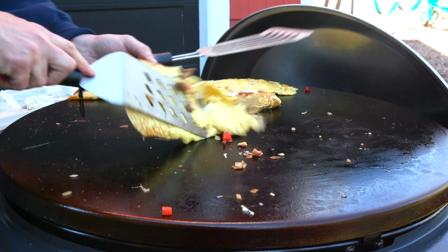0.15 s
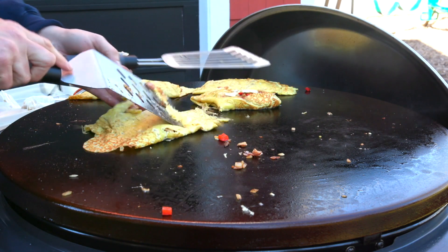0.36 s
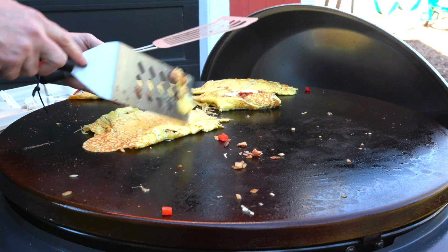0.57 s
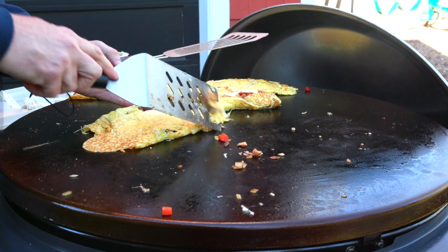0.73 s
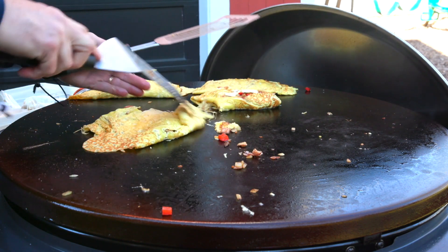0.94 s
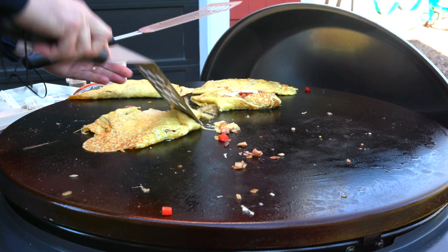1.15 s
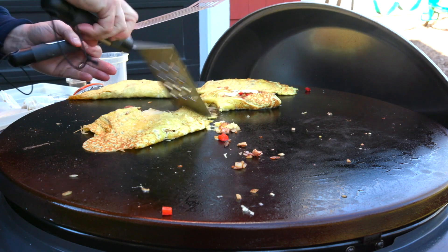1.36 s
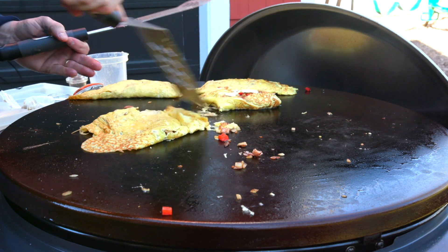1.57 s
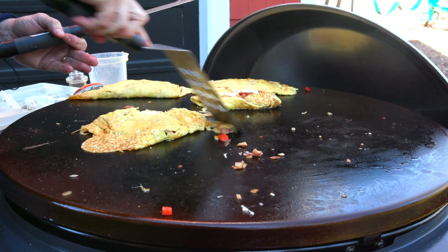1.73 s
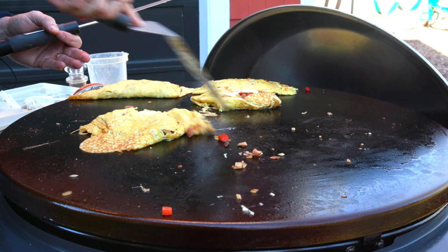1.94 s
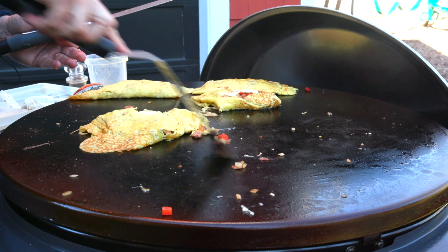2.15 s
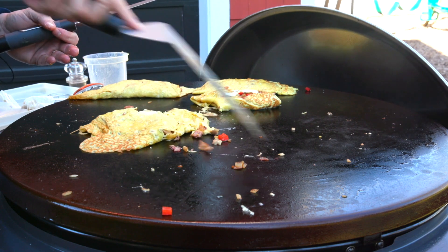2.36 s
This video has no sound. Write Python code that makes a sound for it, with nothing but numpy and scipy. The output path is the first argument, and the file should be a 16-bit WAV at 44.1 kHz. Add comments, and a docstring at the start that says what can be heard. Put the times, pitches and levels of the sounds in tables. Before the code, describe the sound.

A steel spatula clanks and scrapes on an outdoor griddle close to the microphone. A muffled slide under food comes first, then five ringing taps with brief, slightly squeaky drags, over a quiet sizzle of fat.

```python
"""Spatula on a steel griddle

Outdoors, a steel spatula slides softly under an omelette, then lands five times on the bare plate
and drags. Impact and stick-slip friction excite the modes of plate and blade, which ring on.
Fat sizzles and spits quietly throughout, over a low outdoor background."""
import sys
import numpy as np
from scipy import signal
from scipy.fft import rfft, irfft
from scipy.io import wavfile
from scipy.ndimage import uniform_filter1d

SR = 44100
rng = np.random.default_rng(int(sys.argv[2]) if len(sys.argv) > 2 else 0)


def log_audio(samples):
    """Write samples as a 16-bit WAV file to the path given in sys.argv[1]."""
    # one column per channel
    frames = np.atleast_2d(samples).T
    # limit to full scale, then quantise
    limited = np.clip(frames, -1, 1)
    pcm = np.round(limited * 32767).astype(np.int16)
    wavfile.write(sys.argv[1], SR, pcm)


N = 110250
T = np.arange(N) / SR
FFT_SIZE = 4096
AGE = np.arange(8 * FFT_SIZE) / SR   # time since a contact began [s]


# Blade landings: (time [s], level [dB], knock [dB], bass [dB], treble [dB], top [dB])
IMPACTS = [(0.77, 6.5, -1.5, 3, -9.5, -15.5), (1.134, -4, 2, 7.5, 3, 1), (1.44, -3.5, 5.5, 6.5, -1, 0.5),
           (1.7561, -1.5, 11.5, 6, 7.5, 0.5), (2.135, 0.5, 2.5, 7, -4, 6)]
# Edge drags: (start [s], hardest press [s], lift [s], swell width [s], release [s], level [dB],
# light contact [dB], edge resonance [dB], bass [dB], treble [dB], top [dB], squeal [Hz], squeal [dB])
STROKES = [(0.785, 0.861, 0.9, 0.019, 0.006, -30, -1, -8, -5.5, -0.5, -6.5, 5680, -3),
           (1.132, 1.193, 1.201, 0.004, 0.0025, -36.5, -5, -15, 0.5, 7, 9.5, 7090, 3),
           (1.443, 1.452, 1.496, .012, 0.0079, -34, -4, -2, 3, -17.5, -3, 5870, -16),
           (1.765, 1.846, 1.881, 0.023, 0.024, -26.5, -9.5, 6, -7.5, 2.5, 2, 5870, -8.5),
           (2.136, 2.227, 2.287, 0.04, 0.03, -26, -9.5, -5, -5, -1.5, 4, 2885, -11.5)]
def spatula():
    """Forced vibration: the slide, the landings and the drags all set the same steel ringing."""
    direct, ring, total_force = np.zeros((3, N))
    contacts = [(0.00036, slide())] + [(s, landing(*row)) for s, *row in IMPACTS]
    for start, *row in STROKES:
        force, squeal = drag(start, *row)
        contacts.append((start, force))
        add(direct, start, squeal)
    for s, db, *_, top_db in IMPACTS:
        add(direct, s, tick(db + top_db))
    for s, force in contacts:
        add(total_force, s, force)
        add(ring, s, dense_ring(force))
    return direct + ring + clear_modes(total_force)


def landing(db, *tone_db, rattle_s=0.01):
    """Impact force: an impulse, then a brief rattle of the edge."""
    rattle = from_db(-24.5) * noise_burst(rattle_s)
    return from_db(db) * angled((AGE == 0) + rattle, *tone_db)


def tick(db):
    """Contact transient: the first instant of steel on steel radiates a bright snap."""
    highpass = signal.butter(2, 4927, "high", fs=SR, output="sos")
    return from_db(db - 36) * signal.sosfilt(highpass, noise_burst(decay_s=0.0011) + 1e-18)


# Resonances of the blade pressed on the plate: (frequency [Hz], bandwidth [Hz], gain [dB])
CONTACT_RESONANCES = [(679, 63, -30.5), (1554, 63, -28), (2210, 53, -27), (3610, 170, -21),
                      (6400, 350, -26)]
def drag(start, press, lift, width, release, db, light_db, edge_db,
         bass_db, treble_db, top_db, squeal_hz, squeal_db):
    """Sliding friction: force and squeal swell with the pressure and die away after the lift."""
    t = start + AGE
    pressing = swell(t, press, width)
    pressure = np.maximum(pressing, from_db(light_db))
    since_lift = np.maximum(t - lift, 0)
    slips = friction() * pressure * np.exp(-since_lift / release)
    edge = sum(from_db(edge_db + gain_db) * resonate(slips, hz, width_hz)
               for hz, width_hz, gain_db in CONTACT_RESONANCES)
    force = angled(slips + edge, bass_db - 4.5, bass_db, treble_db, top_db)
    tone = wavering(squeal_hz, wobble_hz=45.6, rough_db=3.5, size=len(AGE))
    squeal = tone * pressing * np.exp(-since_lift / 0.028)
    return from_db(db) * force, from_db(db + squeal_db) * squeal


def friction(judder_db=2.5):
    """Stick-slip motion: tiny slips of the edge, bunched by the judder of the blade."""
    slips = grains(per_s=2200, spread_db=4, size=len(AGE))
    return slips * from_db(judder_db * flutter(len(AGE)))


# Knock, bass, middle, treble and top of the contact force: (frequency [Hz])
BANDS_HZ = [220, 550, 2000, 5500, 11000]
def angled(force, knock_db, bass_db, treble_db, top_db):
    """Spectral weighting: the angle of the blade colours the contact force."""
    return colour(force, list(zip(BANDS_HZ, [knock_db, bass_db, 0, treble_db, top_db])))


# Modes of the plate and of the blade: (frequency [Hz], gain [dB], T60 [s])
PLATE_MODES = [(193, -26, 1.0), (408, -29, .5), (487, -25, .8), (516, -24, .65), (728, -21, .4),
               (790, -19, .45), (808, -28, 1.4), (903, -23, 1.2), (1050, -28, .7), (1130, -26, .35),
               (1208, -25, .35), (1276, -22, .55), (1513, -20, .35), (1604, -21, .3)]
SPATULA_MODES = [(1685, -24, .3), (1976, -18, .3), (2148, -20, .35), (2196, -21, .45), (2270, -22, .35),
                 (2326, -22, .45), (2465, -25, .35), (2636, -20, .3), (2930, -20, .25), (3300, -26, .2),
                 (3634, -24, .15), (5790, -22, .22), (6010, -26, .25), (6750, -26, .15)]
def clear_modes(force, wander_hz=11.1):
    """Modal resonance: each mode stores energy near its pitch; its phase wanders while it is driven."""
    out = 0
    for hz, db, t60 in PLATE_MODES + SPATULA_MODES:
        retained = np.exp(-2 * np.log(1000) / (t60 * SR))
        drive = resonate(force, hz, width_hz=hz / 4) ** 2
        energy = signal.lfilter([1 - retained], [1, -retained], drive) + 1e-20
        phase_step = np.sqrt(np.minimum(drive / energy, 1) * 2 * np.pi * wander_hz / SR)
        wander = np.cumsum(phase_step * rng.standard_normal(N))
        phase = 2 * np.pi * (hz * T + rng.random()) + wander
        out = out + from_db(db + 1.5) * np.sqrt(2 * energy) * np.sin(phase)
    return out


# Dense ring of all the steel: (frequency [Hz], relative spectral density [dB])
STEEL_SPECTRUM = [(110, -31), (190, 0), (320, -5.5), (480, -3), (600, -8.5), (1000, -4), (2300, -1),
                  (4100, -6), (6000, -0.5), (7200, -10), (8300, -20.5), (12500, -29), (16000, -35)]
# Its decay: (frequency [Hz], T60 [s])
STEEL_DECAY = [(150, 0.5), (500, 0.69), (1000, 0.44), (2400, 0.29), (4000, 0.12), (7000, 0.081),
               (15000, 0.035)]
def dense_ring(force):
    """Modal overlap: each spot answers with its own crack and a noise-like ring that dies by band."""
    white = rfft(rng.standard_normal(len(AGE)))
    bin_hz = np.arange(len(white)) * SR / len(AGE)
    edges_hz = np.geomspace(100, SR / 2, num=13)
    ring = 0
    for low, high in zip(edges_hz, edges_hz[1:]):
        band = irfft(white * ((bin_hz >= low) & (bin_hz < high)))
        t60 = at_hz(STEEL_DECAY, np.sqrt(low * high))
        ring = ring + band * unit(np.exp(-np.log(1000) * AGE / t60))
    ring = from_db(-3.5) * unit(colour(ring, STEEL_SPECTRUM))
    crack = from_db(-6.5) * unit(colour(noise_burst(decay_s=0.0029), STEEL_SPECTRUM))
    return signal.fftconvolve(force, (ring + crack) / np.sqrt(len(AGE)))[:len(AGE)]


# Friction under the omelette: (time [s], level [dB])
SLIDE_ENVELOPE = [(0, -37.5), (.06, -38.5), (.115, -49), (.15, -43.5), (.195, -43), (.22, -51),
                  (.34, -59.5), (.45, -88), (.55, -72), (.62, -59), (.68, -75), (.73, -94)]
# Muffling by the food: (frequency [Hz], gain [dB])
FOOD_FILTER = [(130, 9), (190, -2), (260, 6), (520, 1), (750, -4), (1050, 0.5), (1600, 3), (2200, -7),
               (4000, -12.5), (6500, -13), (12000, -17)]
def slide():
    """Damped friction: the omelette muffles the force of the blade sliding under it."""
    return colour(friction() * envelope(AGE, SLIDE_ENVELOPE), FOOD_FILTER)


def sing():
    """Friction tone: the blade sings faintly as it slips out."""
    tone = wavering(hz=1057, wobble_hz=8.8, rough_db=1.5, size=N)
    return from_db(-56) * swell(T, s=0.3, width_s=0.11) * tone


# Spectra of the sizzle and of one spit: (frequency [Hz], relative spectral density [dB])
SIZZLE_SPECTRUM = [(1500, -1), (4000, -6.5), (5000, -1.5), (5900, 5), (6700, 1.5), (7500, -4.5),
                   (8500, -20), (12000, -22.5), (16000, -20)]
SPIT_SPECTRUM = [(800, 3), (4000, 0), (6200, 8.5), (9000, -12.5), (16000, -15)]
# Course of the sizzle, and the single spits: (time [s], level [dB])
SIZZLE_ENVELOPE = [(0, -63), (.18, -50.5), (.3, -57), (.55, -61), (1.0, -56), (1.6, -63), (2.1, -62),
                   (2.5, -58.5)]
SPIT_EVENTS = [(.204, -30), (0.381, -28), (0.429, -32.5), (0.54, -32), (.636, -37), (0.917, -26),
               (1.546, -27), (1.594, -33.5), (2.036, -26.5), (2.053, -33)]
def fat():
    """Shot noise: dense tiny clicks merge into the sizzle of fat, with a few louder spits."""
    clicks = grains(per_s=9000, spread_db=5, size=N)
    sizzle = unit(colour(clicks, SIZZLE_SPECTRUM)) * envelope(T, SIZZLE_ENVELOPE)
    spit = unit(colour(noise_burst(decay_s=0.0015, t=T), SPIT_SPECTRUM)) / np.sqrt(N)
    impulses = sum(from_db(db) * (np.arange(N) == int(s * SR)) for s, db in SPIT_EVENTS)
    return sizzle + signal.fftconvolve(impulses, spit)[:N]


# Outdoor background: (frequency [Hz], relative spectral density [dB])
AMBIENT_SPECTRUM = [(20, -1), (35, -6), (65, -6.5), (110, -5), (250, -9), (500, -8.5), (1000, -15.5),
                    (2000, -18), (4000, -29.5), (16000, -36)]
# Puffs of air: (time [s], level [dB])
PUFFS = [(0.2, -55), (0.33, -61.5), (2.04, -57.5)]
def outdoors():
    """Ambient and wind noise: a low steady background and soft puffs of air on the microphone."""
    rumble = resonate(rng.standard_normal(N), hz=32, width_hz=24)
    rumble = unit(colour(rumble, [(50, 14), (200, -74)]))
    gusts = sum(from_db(db) * swell(T, s, width_s=0.043) for s, db in PUFFS)
    background = unit(colour(rng.standard_normal(N), AMBIENT_SPECTRUM))
    return from_db(-55.5) * background + gusts * rumble


def from_db(db):
    """Decibels to amplitude ratio."""
    return 10 ** (np.asarray(db) / 20)


def unit(x):
    """Normalisation to rms 1."""
    return x / np.sqrt(np.mean(x ** 2) + 1e-20)


def envelope(t, points):
    """Amplitude envelope through (time [s], level [dB])."""
    return from_db(np.interp(t, *np.transpose(points)))


def at_hz(points, hz):
    """Interpolation on a log-frequency axis."""
    frequencies, values = np.transpose(points)
    return np.interp(np.log(hz), np.log(frequencies), values)


def colour(x, points):
    """Minimum-phase filter through (frequency [Hz], gain [dB])."""
    hz = np.maximum(np.arange(FFT_SIZE // 2 + 1) * SR / FFT_SIZE, 1)
    cepstrum = irfft(np.log(from_db(at_hz(points, hz))))
    cepstrum[1:FFT_SIZE // 2] *= 2   # folding the cepstrum makes the filter causal
    cepstrum[FFT_SIZE // 2 + 1:] = 0
    return signal.fftconvolve(x, irfft(np.exp(rfft(cepstrum))))[:len(x)]


def resonate(x, hz, width_hz):
    """Two-pole resonance that keeps the power of white noise."""
    radius = np.exp(-np.pi * width_hz / SR)
    feedforward = np.sqrt((1 - radius ** 2) / 2) * np.array([1, 0, -1])
    feedback = [1, -2 * radius * np.cos(2 * np.pi * hz / SR), radius ** 2]
    return signal.lfilter(feedforward, feedback, x + 1e-18)


def swell(t, s, width_s):
    """Gaussian rise and fall about time s."""
    return np.exp(-.5 * ((t - s) / width_s) ** 2)


def noise_burst(decay_s, t=AGE):
    """Exponentially decaying white noise."""
    return rng.standard_normal(len(t)) * np.exp(-t / decay_s)


def grains(per_s, spread_db, size):
    """Poisson train of uneven clicks; rms 1."""
    heights = from_db(spread_db * np.minimum(rng.exponential(1, size), 4))
    signs = rng.choice([-1, 1], size)
    return unit(heights * signs * (rng.random(size) < per_s / SR))


def flutter(size):
    """Quick, smooth random fluctuation; rms 1."""
    return unit(uniform_filter1d(rng.standard_normal(size), size=200))


def wavering(hz, wobble_hz, rough_db, size):
    """Random frequency and amplitude modulation of a tone; rms 1."""
    phase = 2 * np.pi * np.cumsum(hz + wobble_hz * flutter(size)) / SR
    return unit(np.sin(phase) * from_db(rough_db * flutter(size)))


def add(out, s, x):
    """Superposition of x on out from time s."""
    i = max(int(s * SR), 0)
    out[i:i + len(x)] += x[:N - i]


def scene():
    """Superposition of spatula on steel, hot fat and open air."""
    return (spatula() + sing() + fat() + outdoors())[None]


def record(dry, cutoff_hz=16200):
    """Band limiting: a steep low-pass cuts the highest treble."""
    return signal.sosfilt(signal.ellip(12, .1, 80, cutoff_hz, fs=SR, output="sos"), dry)


dry = scene()
out = record(dry)
log_audio(out)
```